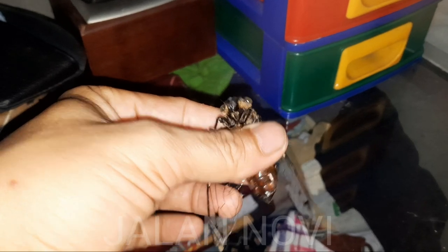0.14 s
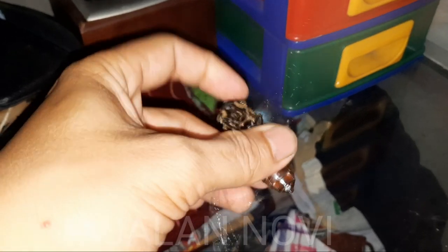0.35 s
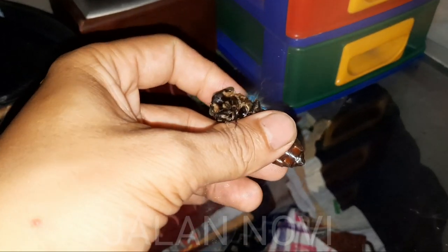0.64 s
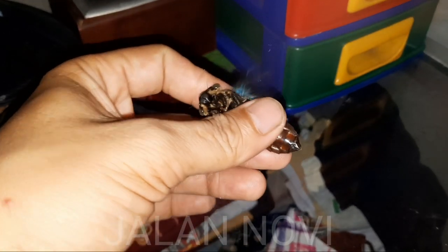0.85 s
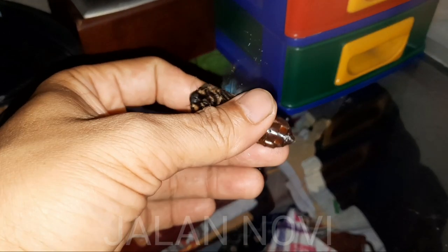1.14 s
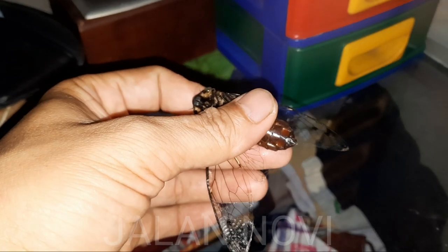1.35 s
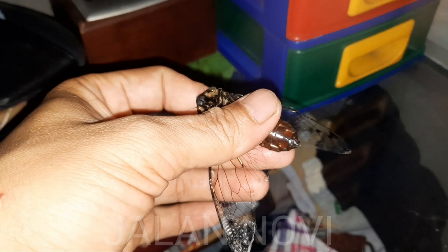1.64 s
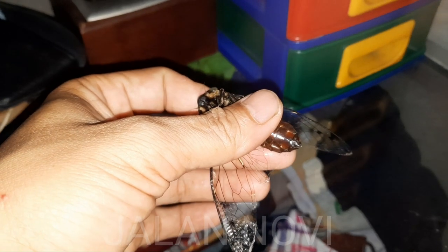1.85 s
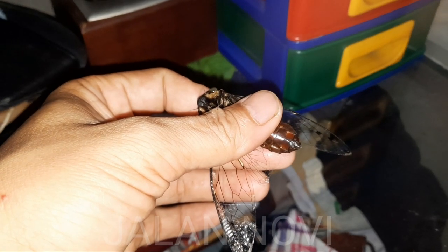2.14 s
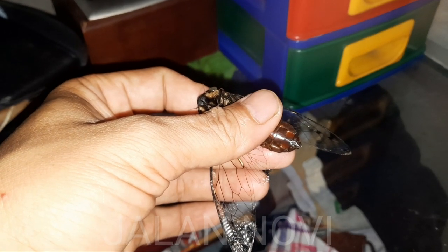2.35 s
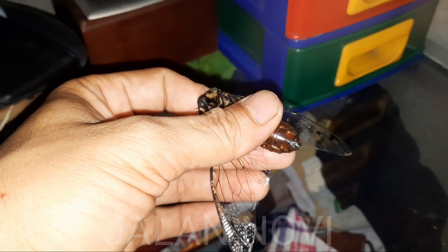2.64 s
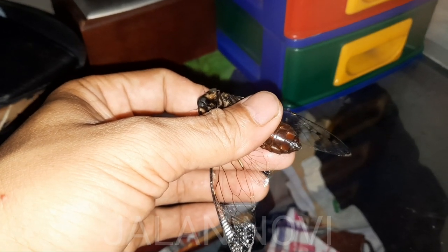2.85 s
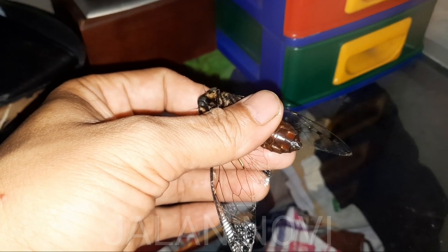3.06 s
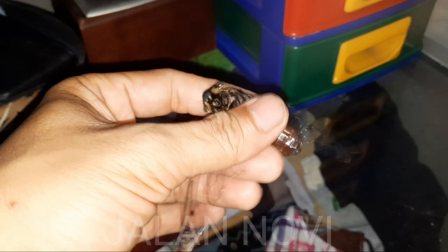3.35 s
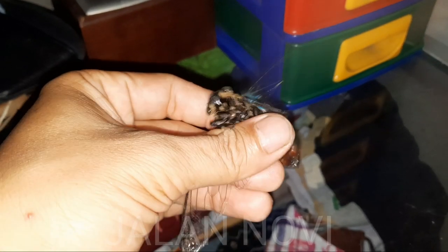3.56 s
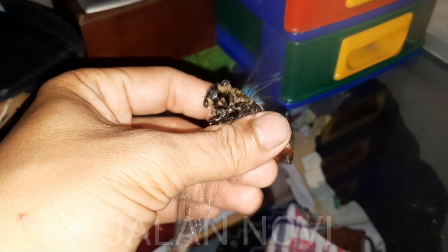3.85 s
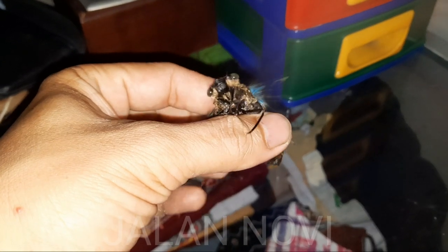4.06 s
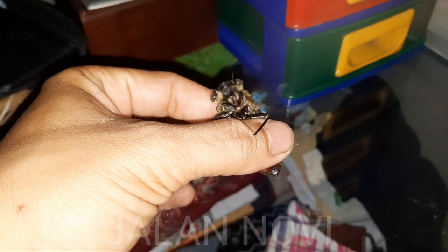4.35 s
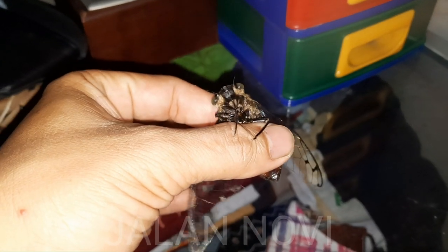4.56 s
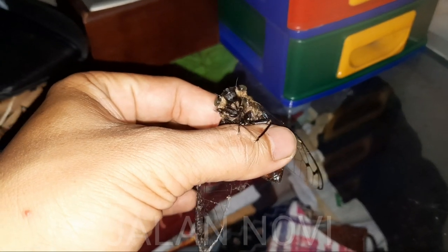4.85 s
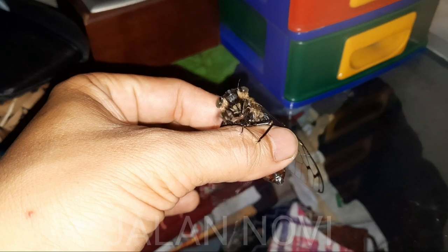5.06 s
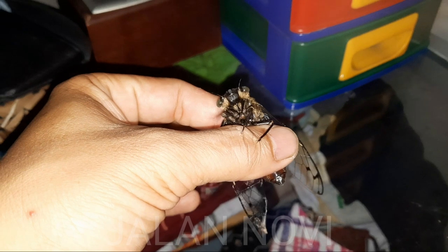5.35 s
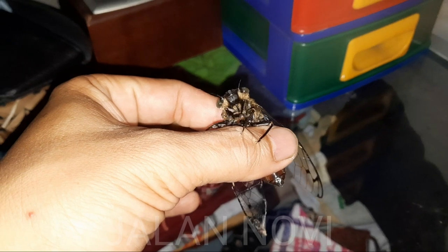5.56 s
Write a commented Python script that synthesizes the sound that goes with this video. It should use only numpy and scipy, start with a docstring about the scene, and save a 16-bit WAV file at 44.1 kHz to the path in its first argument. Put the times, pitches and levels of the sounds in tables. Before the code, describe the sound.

A cicada held in fingers gives harsh, dry rattling buzzes that stop and restart, with brief low wing flutters against the hand in a small room.

```python
"""A cicada held between finger and thumb buzzes harshly, close to a pair of microphones in a small room.
Two ribbed tymbals buckle in and out about 108 times a second and ring its hollow body; the grip sets the colour.
Three runs of wing beats against the hand, the last two nearly joined, add puffs of air and scuffs.
Behind it lie the short diffuse tail of the room, a low hum, room air and the steady hiss of far night insects."""
import sys
import numpy as np
from scipy import signal
from scipy.fft import rfft, irfft
from scipy.io import wavfile
from scipy.ndimage import uniform_filter1d

SR = 44100
rng = np.random.default_rng(int(sys.argv[2]) if len(sys.argv) > 2 else 0)


def unload_wav(signal):
    """Save mono or channel-first audio to the path in sys.argv[1] as 16-bit WAV at rate SR, clipped to [-1, 1]."""
    wavfile.write(
        sys.argv[1],
        SR,
        np.round(np.clip(np.atleast_2d(signal).T, -1, 1) * 32767).astype(np.int16),
    )


N = 250929
TIME = np.arange(N) / SR  # s
FFT_SIZE = 16384
GRID = np.maximum(np.arange(FFT_SIZE // 2 + 1) * SR / FFT_SIZE, 1)  # Hz

# each buzz [start t/s, end t/s, settled tymbal cycle rate f/Hz]
BUZZES = [(0, .078, 107), (.085, 1.316, 107.3), (1.339, 1.49, 107), (1.518, 1.672, 107.4),
          (1.715, 1.819, 107.4), (1.831, 1.922, 107.8), (2.068, 2.254, 108.2), (3.309, 4.336, 108.6),
          (4.345, 4.512, 108.6), (4.545, 4.761, 109.2), (4.932, 5.527, 110.6), (5.563, 5.69, 109.6)]
# the hold [t/s, power share with belly free, share with belly under the thumb, share turned belly up]
GRIP = [(0, 0.69, 0.091, 0.021), (.24, 0.66, 0.15, 0), (.33, 0.042, 0.79, 0), (.6, 0.023, 0.77, 0.001),
        (1.3, 0.012, 0.9, 0.002), (3.3, 0.19, 0.39, 0.017), (3.39, 0.99, 0.07, 0.0017), (3.9, 1, 0.013, 0),
        (4.2, 0.11, 0.03, 0.6), (4.7, 0.0024, 0.15, 0.67), (5.1, 0.1, 0, 0.88)]
# broad colour of a click with the belly free, under the thumb, turned up [f/Hz, level/dB per Hz];
# the outermost rows are not used
FREE = [(350, -65), (600, -33.5), (854, -42.5), (1270, -18.5), (1590, -10.5), (1750, 1), (2210, 2),
        (2400, -6), (3230, -3.5), (4130, -12.5), (5060, -11), (5870, -6.5), (7500, -16), (15400, -18)]
COVERED = [(350, -63), (600, -29), (843, -15), (1020, -21), (1270, -9.5), (1490, -12), (1750, -1),
           (2040, -5), (3650, -6.5), (4420, -12.5), (5560, -8.5), (8140, -11), (9320, -9), (15400, -10)]
TURNED = [(350, -64), (600, -47), (866, -11), (1050, -18), (1550, -6), (1830, -0.5), (2430, -6), (3230, -1),
          (4540, -3), (4860, -4), (6200, -4.5), (7200, -7.5), (10100, -10), (15400, -14)]
# body resonances in the same three grips [f/Hz, width/Hz, lift/dB]
FREE_BODY = [(215, 68, 9), (428.8, 120, -4.5), (1730, 180, -2.5), (2280, 110, -0.5), (2480, 130, -5.5),
             (3170, 140, 4.5), (3900, 400, -1.5), (4750, 190, 3.5), (5280, 300, -7), (5550, 1600, 4),
             (9900, 2500, 1), (13400, 900, -7.5)]
COVERED_BODY = [(430, 130, 1.5), (904, 21, -9.5), (1350, 150, 0), (1820, 130, 2), (2690, 270, 4.5),
                (2890, 180, -7), (4120, 84, 7), (8400, 200, 0), (9410, 280, 7.5), (10510, 700, -3),
                (11860, 700, 4.5)]
TURNED_BODY = [(450, 70, 5.5), (1420, 27, -6), (1850, 220, 1.5), (2130, 100, 2.5), (2752, 20, 11),
               (3216, 36, 12), (4050, 550, -2), (4630, 120, 5.5), (4730, 270, 1.5), (5680, 1000, 4.5),
               (10100, 650, 7), (13200, 700, 1)]
# the three grips [colour, resonances, left minus right level/dB]
HOLDS = [(FREE, FREE_BODY, -0.27), (COVERED, COVERED_BODY, .3), (TURNED, TURNED_BODY, -0.5)]
# low end of the buzz, alike in all grips [f/Hz, level/dB against its strongest range]
BUZZ_BASS = [(40, -37), (110, -39.5), (220, -38), (330, -25), (430, -24.5), (580, -34.5), (700, -36.5)]
# the four snaps of a cycle, each tymbal in and out
# [place in the cycle 0-1, relative level/dB, mean gap between ribs t/ms, extra depth of the buckle level/dB]
SNAPS = [(0.0, -2, .42, -16.5), (0.249, -0.5, .5, 3.5), (.49, 0.5, .38, -14), (0.739, 1, .35, -3)]
# stereo balance of the buzz, added to that of the grip [f/Hz, left minus right level/dB]
BUZZ_BALANCE = [(60, 1.0), (99, -2.5), (160, -10), (270, -5.5), (450, 5.5), (740, -1.5), (1220, 0),
                (2010, 7), (3330, 0.5), (5500, -3.5), (9080, 2.5), (15000, -1.5)]
# settled buzz as the hand shifts, before the trim in scene() [t/s, level/dB]
BUZZ_LEVEL = [(0, -13.5), (.23, -14.5), (.31, -20), (.42, -19), (.48, -16.5), (1.28, -17.5), (1.4, -16),
              (2.25, -15.5), (3.42, -12.5), (4.15, -16), (4.7, -16), (5.2, -16), (5.69, -16)]
# wing beats, one table per bout [t/s, beat rate f/Hz]
WING_RATES = [
    [(.292, 36.4), (.5, 36.4), (.55, 33.4), (.83, 33.8), (.9, 35.3), (1.25, 35.3)],
    [(3.504, 22.4), (3.67, 22.2), (3.79, 25), (3.86, 27), (3.975, 31)],
    [(3.989, 31), (4.06, 36), (4.2, 36.8), (4.48, 38)],
]
# colour of the puff of air, one table per bout [f/Hz, relative level/dB per Hz]
WING_PUFFS = [
    [(21, -48.5), (35, -13), (64, 0.5), (97, -2.5), (141, 1.5), (226, -13), (320, 0), (391, -12),
     (600, -25.5), (780, -44), (1320, -120)],
    [(21, -40), (35, -14), (102, 1), (189, -3.5), (294, 2), (386, -11), (435, -10), (600, -30), (780, -52),
     (1320, -120)],
    [(21, -41), (35, -13), (64, -1.5), (144, 0), (237, -12), (327, 0.5), (386, -5.5), (435, -10),
     (600, -14), (780, -46), (1320, -120)],
]
# each bout [level/dB before the trim in scene(), sag/dB per s,
# trough-to-peak chop of the buzz level/dB with the belly bare, lead of the chop/beats]
WING_BOUTS = [(-34, 5, 0, .2), (-38.5, 15, -0.3, .05), (-37.5, 2, 3.1, 0.064)]
# far insects [f/Hz, width/Hz, relative level/dB]
NIGHT_CHORUS = [(2298, 110, -66), (2510, 83, -70), (1420, 120, -87), (4900, 770, -77.5),
                (8650, 2500, -79.5)]
# room hum before its swell [f/Hz, level/dB]
HUM = [(51.5, -74), (103, -74), (155, -70), (254, -76)]
# colour of the room air [f/Hz, relative level/dB per Hz]
AIR = [(25, -22), (50, -4.5), (150, -2.5), (300, -6.5), (500, -13.5), (900, -25), (2000, -29),
       (6000, -29.5), (15000, -42)]
# hum and air swell and sink together [t/s, level/dB]
HUM_SWELL = [(0, 11), (1.3, 16), (1.8, 9.5), (2.5, -0.5), (3.3, -2.5), (4.6, -4), (5.69, -8)]
# room decay [f/Hz, t60 t/s]
ROOM_T60 = [(200, 0.33), (1000, 0.44), (2200, 0.61), (5000, 0.46), (9000, 0.48), (15000, 0.3)]
# strength of the room's answer [f/Hz, relative level/dB]
ROOM_SEND = [(200, -14), (800, -10.5), (2000, -15), (5000, -15), (9000, -26), (15000, -9.5)]

# the muscles start slow, overshoot and settle with a dying swing, wander, then slow and weaken at the stop
START_SLOW_HZ, START_S = 11.0, .02
SWING_HZ, SWING_PERIOD_S, SETTLE_S = 2.0, .125, .1
WANDER_HZ, WANDER_STEP_S = .6, .045
STOP_SLOW_HZ, STOP_S, STOP_WEAK_DB = 11.0, .02, 1.5
# a buzz swells in from further down the longer the rest: dB down after 1 s, power of the rest, time constant
SWELL_DB, SWELL_POWER, SWELL_S = 14, 0.38, 0.028
# a bout of wing beats fades in and out: dB down at its ends, time constant
WING_FADE_DB, WING_FADE_S = 1, 0.023
# taken off the bare belly's chop factor of 0.5 when the thumb covers it fully
THUMB_SHIELD = .35
CUTOFF_HZ = 15700


def from_db(db):
    """Decibels to gain."""
    return 10 ** (np.asarray(db) / 20)


def rms_one(x):
    """Scale to rms 1."""
    return x / np.sqrt(np.mean(x ** 2) + 1e-20)


def column(rows, index, at=TIME):
    """One column of a curve, read at the given times."""
    rows = np.array(rows)
    return np.interp(at, rows[:, 0], rows[:, index])


def at_hz(points, hz):
    """A spectrum read on a log-frequency axis."""
    points = np.array(points)
    return np.interp(np.log(hz), np.log(points[:, 0]), points[:, 1])


def response(curve_db):
    """Causal, minimum-phase impulse response of a gain curve on GRID."""
    cepstrum = irfft(np.log(from_db(curve_db)))
    cepstrum[1:FFT_SIZE // 2] *= 2
    cepstrum[FFT_SIZE // 2 + 1:] = 0
    return irfft(np.exp(rfft(cepstrum)))[:FFT_SIZE // 2]


def through(x, impulse):
    """Pass a signal through an impulse response."""
    return signal.fftconvolve(x, impulse)[:N]


def filtered(x, order, hz, kind):
    """Pass a signal through a Butterworth filter."""
    return signal.sosfilt(signal.butter(order, hz, kind, fs=SR, output="sos"), x)


def clicks(times, sizes, order=4):
    """Band-limited clicks, placed between the samples."""
    fine = np.zeros(N * order)
    at = np.round(times * SR * order).astype(int)
    inside = (at >= 0) & (at < len(fine))
    np.add.at(fine, at[inside], sizes[inside])
    return signal.resample_poly(fine, 1, order) * order


def cycle_times(rate_rows, start, end, place=0):
    """Moments at which a cycle of changing rate passes a given place."""
    t = np.arange(start, end, 1 / SR)
    turns = np.cumsum(column(rate_rows, index=1, at=t)) / SR
    return np.interp(np.arange(place, turns[-1], 1), turns, t)


def muscle_rate(start, end, rate):
    """Tymbal rate through one buzz as rows (t/s, f/Hz): an arch with a dying swing and a little wander."""
    age = np.linspace(0, end - start, num=400)
    slow_start = START_SLOW_HZ * np.exp(-age / START_S)
    slow_stop = STOP_SLOW_HZ * np.exp((age - age[-1]) / STOP_S)
    swing = SWING_HZ * np.exp(-age / SETTLE_S) * np.cos(2 * np.pi * age / SWING_PERIOD_S)
    steps = rng.standard_normal(size=100)
    wander = WANDER_HZ * np.interp(age / WANDER_STEP_S, np.arange(len(steps)), steps)
    return np.column_stack([start + age, rate - (slow_start + slow_stop) - swing + wander])


def tymbals(jitter_ms, waver_ms, rib_spread, rib_jitter, uneven_db, rib_fall_db, deep_hz, count=4):
    """Every snap is a quick run of ribs buckling one after another, on average each weaker than the last."""
    out, rib = np.zeros(N), np.arange(count)
    # the muscles drift a little ahead or behind over the cycles
    knots = np.arange(0, N / SR, .02)
    waver = waver_ms * rng.standard_normal(len(knots))
    muscle = [(muscle_rate(start, end, rate), start, end) for start, end, rate in BUZZES]
    for place, snap_db, gap_ms, depth_db in SNAPS:
        snap = [cycle_times(rates, start, end, place % 1) for rates, start, end in muscle]
        snap = np.concatenate(snap)[:, None]
        slip, force, delay = rng.standard_normal((3, 1000, count))[:, :len(snap)]
        # the ribs lie unevenly, and keep nearly the same spacing from cycle to cycle
        gaps = gap_ms * (1 + rib_spread * rng.standard_normal(count) + rib_jitter * slip)
        run_ms = np.cumsum(gaps, axis=1) - gaps[:, :1]
        late_ms = run_ms + jitter_ms * delay[:, :1] + np.interp(snap, knots, waver)
        times = snap + late_ms / 1000
        sizes = from_db(snap_db - rib_fall_db * rib + uneven_db * force)
        train = clicks(times.ravel(), sizes.ravel())
        # a deep buckle moves more air and so is fuller below the treble
        out += train + from_db(depth_db) * filtered(train, 1, deep_hz, "low")
    return rms_one(out)


def hand_scatter(scatter_db, t60, lowest_hz):
    """The direct click and a short spray of reflections off the fingers, which long waves bend around."""
    t = np.arange(FFT_SIZE // 8) / SR
    spray = rng.standard_normal(len(t)) * from_db(-60 * t / t60)
    spray = filtered(spray, 1, lowest_hz, "high")
    spray *= from_db(scatter_db) / np.linalg.norm(spray)
    spray[0] += 1
    return spray


def shifting_scatter(x, turn_hz):
    """Reflections near one microphone; they shift slowly as the hand trembles."""
    first, second = (through(x, hand_scatter(scatter_db=-0.5, t60=0.023, lowest_hz=900)) - x
                     for pose in range(2))
    angle = 2 * np.pi * (turn_hz * TIME * rng.uniform(.6, 1.4) + rng.random())
    return x + np.cos(angle) * first + np.sin(angle) * second


def evened(pair, weight):
    """Flatten the broad colour of a stereo pulse train where heard, keep its harmonics, set the centre to rms 1."""
    mid_and_side = np.array([pair[0] + pair[1], pair[0] - pair[1]])
    mid, side = signal.welch(mid_and_side * weight, nperseg=FFT_SIZE)[1]
    power = uniform_filter1d(mid + side / 4, size=120)
    flatten = response(-10 * np.log10(power + 1e-15))
    pair = np.array([through(ear, flatten) for ear in pair])
    return pair * np.linalg.norm(weight) / (np.linalg.norm(pair.mean(axis=0) * weight) + 1e-20)


def body(spectrum, resonances):
    """Gain curve in dB of the hollow abdomen in one grip: broad colour, shared bass and resonant peaks or dips."""
    fade_from, fade_to = BUZZ_BASS[-2][0], BUZZ_BASS[-1][0]
    above_bass = np.clip((GRID - fade_from) / (fade_to - fade_from), 0, 1)
    broad = above_bass * at_hz(spectrum[1:-1], GRID) + (1 - above_bass) * at_hz(BUZZ_BASS, GRID)
    return broad + sum(lift_db / (1 + (2 * (GRID - hz) / width) ** 2) for hz, width, lift_db in resonances)


def effort_db():
    """Each buzz swells to its settled level, holds it, and weakens just before it stops."""
    shortfall, last_end = np.zeros(N), 0
    for start, end, _ in BUZZES:
        since = TIME >= start
        t = np.minimum(TIME[since], end)
        rest = max(start - last_end, 0)
        swell = SWELL_DB * rest ** SWELL_POWER * np.exp((start - t) / SWELL_S)
        shortfall[since] = swell + STOP_WEAK_DB * np.exp((t - end) / STOP_S)
        last_end = end
    return column(BUZZ_LEVEL, index=1) - shortfall


def buzz(level_db, right_lag_ms):
    """Rib clicks with a little crackle ring the body; effort sets the level, the grip the colour."""
    snaps = tymbals(jitter_ms=0.037, waver_ms=0.054, rib_spread=0.26, rib_jitter=0.089, uneven_db=1.28,
                    rib_fall_db=2.0, deep_hz=3205)
    # noise that follows the strength of the snaps
    envelope = np.sqrt(np.abs(uniform_filter1d(snaps ** 2, size=60)))
    crackle = from_db(-8.5) * envelope * rng.standard_normal((2, N))
    buzzing = sum((TIME > start) & (TIME < end) for start, end, _ in BUZZES)
    effort = from_db(effort_db() + level_db)
    out = np.zeros((2, N))
    for k, (spectrum, resonances, left_db) in enumerate(HOLDS):
        share = np.sqrt(np.clip(column(GRIP, index=k + 1), 0, 1))
        in_hand = through(snaps, hand_scatter(scatter_db=-7.0, t60=0.013, lowest_hz=594))
        # each microphone also catches reflections of its own, and the right one hears later
        left, right = (shifting_scatter(in_hand, turn_hz=0.2) for ear in range(2))
        right = np.roll(right, round(right_lag_ms * SR / 1000))
        rough = np.array([left, right]) + np.diff(crackle, prepend=0)
        drive = evened(rough, share * buzzing) * effort * share
        tilt_db = (at_hz(BUZZ_BALANCE, GRID) + left_db) / 2
        body_db = body(spectrum, resonances)
        colours = np.array([response(body_db + side * tilt_db) for side in (1, -1)])
        colours /= np.linalg.norm(colours.mean(axis=0))
        out += [through(ear, colour) for ear, colour in zip(drive, colours)]
    return out


def room(x, build_s):
    """A diffuse tail for each side that builds up quickly and decays at its own pace in each band."""
    t = np.arange(2 * FFT_SIZE) / SR
    edges = np.geomspace(100, 16000, 9)
    tail = np.zeros((2, len(t)))
    for low, high in zip(edges, edges[1:]):
        hz = np.sqrt(low * high)
        fade = from_db(-60 * t / at_hz(ROOM_T60, hz)) * (1 - np.exp(-t / build_s))
        noise = filtered(rng.standard_normal(tail.shape), 2, [low, high], "band")
        tail += noise * fade / np.linalg.norm(fade) * from_db(at_hz(ROOM_SEND, hz))
    return np.array([through(side, impulse) for side, impulse in zip(x, tail)])


def stereo_noise(curve_db, width):
    """Steady noise of a given colour: a centre of rms 1 and opposed sides of rms width."""
    mid, side = (rms_one(through(white, response(curve_db))) for white in rng.standard_normal((2, N)))
    return mid + width * side * np.array([[1], [-1]])


def night(air_db, chorus_db):
    """Room air as coloured noise, a low hum of sines, and far insects blurred into steady bands of noise."""
    power = sum(from_db(db) ** 2 / width / (1 + (2 * (GRID - hz) / width) ** 2) ** 2
                for hz, width, db in NIGHT_CHORUS)
    chorus = from_db(chorus_db) * stereo_noise(10 * np.log10(power), width=.8)
    hum = sum(from_db(db) * np.sqrt(2) * np.sin(2 * np.pi * (hz * TIME + rng.random())) for hz, db in HUM)
    air = from_db(air_db) * stereo_noise(at_hz(AIR, GRID), width=.5)
    return (air + hum) * from_db(column(HUM_SWELL, index=1)) + chorus


def wing_effort_db(start, end, level_db, sag_db_per_s):
    """A bout of wing beats fades in, tires steadily and fades out."""
    t = np.clip(TIME, start, end)
    fades = np.exp((start - t) / WING_FADE_S) + np.exp((t - end) / WING_FADE_S)
    return level_db - sag_db_per_s * (t - start) - WING_FADE_DB * fades


def wings(level_db, backstroke_db, backstroke_place, uneven_db, jitter_ms, swirl_db, swirl_s, scuff_db):
    """Each beat throws a puff of air, a weaker one on the way back, and scuffs the fingers."""
    out = np.zeros((2, N))
    for rates, (bout_db, sag_db_per_s, _, _), puff in zip(WING_RATES, WING_BOUTS, WING_PUFFS):
        start, end = rates[0][0], rates[-1][0]
        down = cycle_times(rates, start, end)
        back = cycle_times(rates, start, end, backstroke_place)
        times = np.concatenate([down, back])
        times = times + jitter_ms * rng.standard_normal(len(times)) / 1000
        sizes_db = np.repeat([0, backstroke_db], [len(down), len(back)])
        sizes_db = sizes_db + uneven_db * rng.standard_normal(len(times))
        beats = rms_one(clicks(times, from_db(sizes_db)))
        # eddies follow every stroke, different at each microphone
        dying = signal.lfilter([1], [1, -np.exp(-1 / (swirl_s * SR))], beats + 1e-18)
        swirl = rms_one(dying * rng.standard_normal((2, N)))
        colour = response(at_hz(puff, GRID))
        air = rms_one(np.array([through(beats + from_db(swirl_db) * eddies, colour) for eddies in swirl]))
        scuff = rms_one(filtered(swirl, 1, [950, 1350], "band"))
        effort = from_db(wing_effort_db(start, end, bout_db, sag_db_per_s) + level_db)
        # rms 1 was taken over the whole length, so a short bout is scaled down
        out += effort * np.sqrt((end - start) * SR / N) * (air + from_db(scuff_db) * scuff)
    return out * from_db([[.4], [-.4]])  # slightly to the left


def wing_shadow():
    """Beating wings sweep across the tymbals and chop the buzz, less so while the thumb covers the belly."""
    chop_db = np.zeros(N)
    for rates, (_, _, depth_db, lead) in zip(WING_RATES, WING_BOUTS):
        beating = (TIME > rates[0][0]) & (TIME < rates[-1][0])
        turns = np.cumsum(column(rates, index=1) * beating) / SR
        chop_db += depth_db * np.cos(2 * np.pi * (turns + lead)) * beating
    return from_db(chop_db * (0.5 - THUMB_SHIELD * column(GRIP, index=2)))


def scene():
    """The insect close by, the room around it, the night behind."""
    insect = buzz(level_db=0.24, right_lag_ms=.09) * wing_shadow()
    insect = insect + wings(level_db=-0.76, backstroke_db=-10.5, backstroke_place=0.469, uneven_db=0.85,
                            jitter_ms=0.24, swirl_db=-3.0, swirl_s=.008, scuff_db=-1)
    return insect + room(insect, build_s=0.0022) + night(air_db=-67.5, chorus_db=-66)


def record(dry):
    """The highest peaks are rounded and the top is cut."""
    top = 1.4
    rounded = top * np.tanh(dry / top)
    return signal.sosfilt(signal.ellip(12, .1, 80, CUTOFF_HZ, fs=SR, output="sos"), rounded)


dry = scene()
out = record(dry)
unload_wav(out)
```